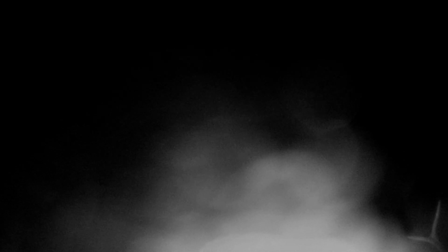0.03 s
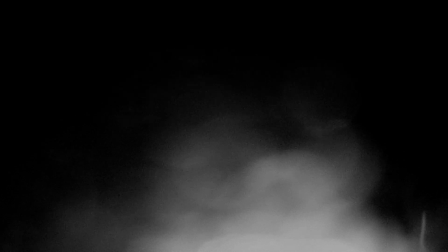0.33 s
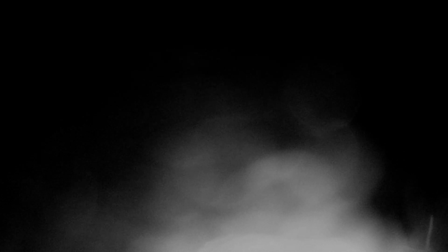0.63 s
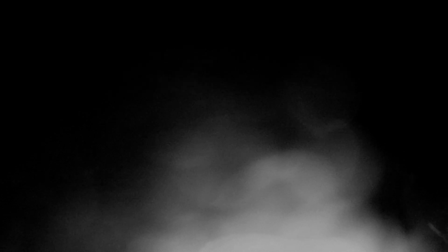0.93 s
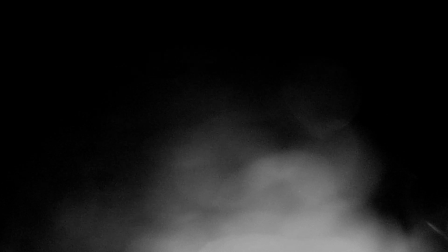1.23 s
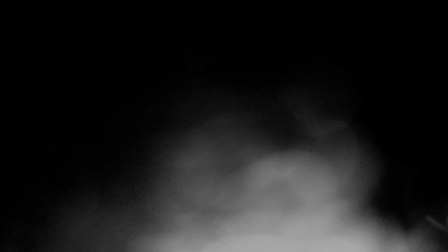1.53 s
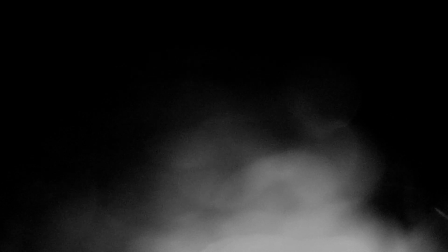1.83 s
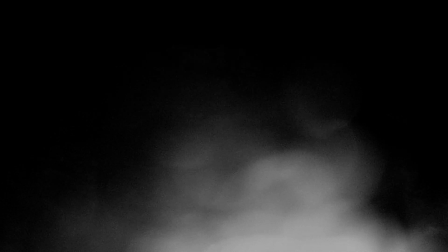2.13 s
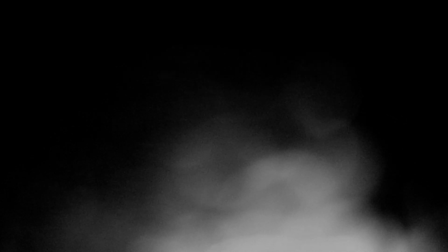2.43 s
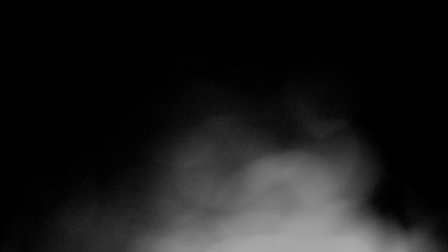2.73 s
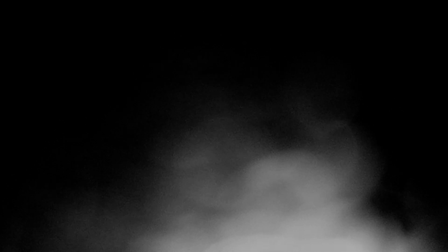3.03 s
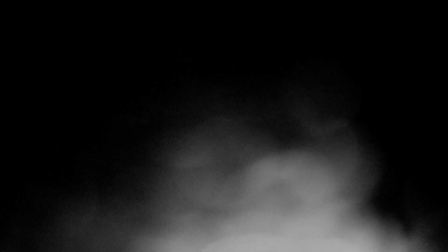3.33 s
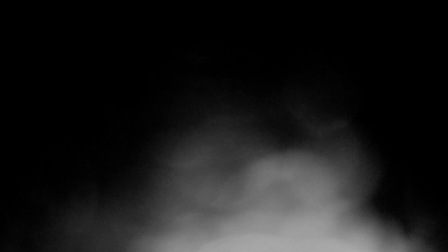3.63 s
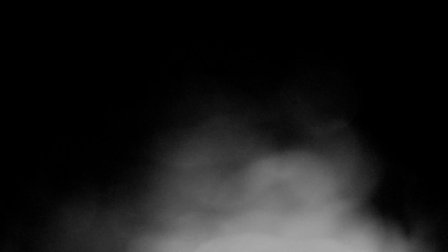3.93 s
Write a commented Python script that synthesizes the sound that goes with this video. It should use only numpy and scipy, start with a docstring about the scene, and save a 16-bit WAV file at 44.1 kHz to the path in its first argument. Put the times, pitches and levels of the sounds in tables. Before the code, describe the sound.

A dog whines close to the microphone in thin, falling squeals and huffs softly. It grumbles once and shifts, clattering against something hollow. Coyotes yip faintly far off in the night woods, then the dog whines again, hoarsely.

```python
"""In the woods at night. A dog close by whines in thin falling squeals, their upper harmonics shaped by
its muzzle; it huffs, grumbles once and shifts about, rustling and knocking on something hollow.
Far off, coyotes yip and howl in nearly pure glides that echo from the trunks.
A low machine throb and a faint hiss lie underneath."""
import sys
import numpy as np
from scipy import signal
from scipy.fft import rfft, irfft
from scipy.io import wavfile

SR = 44100
rng = np.random.default_rng(int(sys.argv[2]) if len(sys.argv) > 2 else 0)


def store_wav(level_fs):
    """Save 16-bit WAV to argv[1]."""
    pcm = np.round(np.clip(np.atleast_2d(level_fs), -1, 1) * 32767)
    wavfile.write(sys.argv[1], SR, pcm.T.astype(np.int16))


N = 176400
T = np.arange(N) / SR


def from_db(db):
    return 10 ** (np.asarray(db) / 20)


def unit_rms(x):
    return x / np.sqrt(np.mean(x ** 2) + 1e-20)


def curves(rows):
    """Each column after time, interpolated to every sample."""
    times_s, *columns = np.transpose(rows)
    return [np.interp(T, times_s, column) for column in columns]


def db_at(spectrum, hz):
    """Spectrum level, interpolated in log frequency."""
    points_hz, points_db = np.transpose(spectrum)
    return np.interp(np.log(hz + 1e-9), np.log(points_hz), points_db)


def drift(rate_hz):
    """Smooth random wander, rms 1."""
    hop, settle = 20, 2000
    pole = np.exp(-2 * np.pi * rate_hz * hop / SR)
    white = rng.standard_normal(N // hop + settle + 2)
    slow = signal.lfilter([1], [1, -2 * pole, pole * pole], white)[settle:]
    return np.interp(np.arange(N) / hop, np.arange(len(slow)), unit_rms(slow))


def shaped_noise(spectrum):
    gain = from_db(db_at(spectrum, np.fft.rfftfreq(N, 1 / SR)))
    return unit_rms(irfft(rfft(rng.standard_normal(N)) * gain, N))


def band_noise(low_hz, high_hz):
    bandpass = signal.butter(2, [low_hz, high_hz], "band", fs=SR, output="sos")
    return unit_rms(signal.sosfilt(bandpass, rng.standard_normal(N)))


def gate(start_s, end_s, fade_s):
    ramp = np.clip(np.minimum(T - start_s, end_s - T) / fade_s, 0, 1)
    return np.sin(np.pi / 2 * ramp) ** 2


def phase_of(hz):
    return 2 * np.pi * np.cumsum(hz) / SR


def ring(clicks, hz, t60_s):
    """One mode: a unit click starts a decaying unit sine."""
    radius = np.exp(-np.log(1000) / (t60_s * SR))
    angle = 2 * np.pi * hz / SR
    return signal.lfilter([0, np.sin(angle)], [1, -2 * radius * np.cos(angle), radius ** 2], clicks + 1e-18)


def glides(rows, fade_s, waver, second_db):
    """Wavering sine glides with a weak second harmonic."""
    out = np.zeros(N)
    wobble = 1 + waver * drift(28)
    for start_s, length_s, start_hz, end_hz, db in rows:
        end_s = start_s + length_s
        phase = phase_of(np.interp(T, [start_s, end_s], [start_hz, end_hz]) * wobble)
        tone = np.sin(phase) + from_db(second_db) * np.sin(2 * phase)
        out += from_db(db) * gate(start_s, end_s, fade_s) * tone
    return np.sqrt(2) * out


# Throb partials: (harmonic number, level [dB])
THROB_PARTIALS = [(1, -52), (2, -58), (3, -75), (4, -74), (5, -71.5), (7, -75), (8, -70)]


def machine_throb(pitch_hz=19.85):
    """Low machine harmonics, drifting slightly in pitch and level."""
    phase = phase_of(pitch_hz * (1 + 0.006 * drift(3)))
    out = np.zeros(N)
    for k, db in THROB_PARTIALS:
        out += from_db(db + 0.57 * drift(1.3)) * np.sin(k * phase + rng.uniform(0, 2 * np.pi))
    return np.sqrt(2) * out


# Noise floor: (frequency [Hz], gain [dB])
FLOOR_SPECTRUM = [(15, -24), (25, -6), (35, -7), (60, -19), (92, -13), (126, -27), (153, -17), (185, -23),
                  (300, -26), (411, -31.5), (770, -38.5), (934, -38.5), (1030, -37.5), (1160, -43.5),
                  (1310, -38.5), (1440, -42.5), (8000, -59), (10400, -93), (17600, -120)]


def faint_hiss(level_db=-62.5):
    """Steady noise, weighted to the bass."""
    return from_db(level_db) * shaped_noise(FLOOR_SPECTRUM)


def woods_echo(x, gain_db, t60_s=0.53):
    """Diffuse echo from the trunks."""
    tail = band_noise(324, 3780) * np.exp(-np.log(1000) * T / t60_s)
    tail /= np.sqrt(np.sum(tail ** 2))
    return from_db(gain_db) * signal.fftconvolve(x, tail)[:N]


# Calls: (time [s], length [s], start [Hz], end [Hz], level [dB])
COYOTE_CALLS = [(2.61, 0.072, 1310, 1240, -73.5), (2.63, 0.041, 850, 752, -71),
                (2.83, 0.045, 1120, 1059, -69.5), (2.85, 0.055, 760, 921, -62),
                (2.88, 0.066, 870, 986, -69.5), (2.97, 0.051, 730, 873, -64.5),
                (3.01, 0.077, 1000, 1005, -64), (3.1, 0.095, 950, 1141, -69.5),
                (3.22, 0.11, 980, 1127, -69), (3.29, 0.047, 1320, 1346, -73), (3.34, 0.097, 990, 1127, -71),
                (3.42, .06, 1360, 1340, -72), (3.47, 0.093, 1220, 1360, -70.5),
                (3.56, 0.095, 1330, 1294, -75), (3.63, 0.045, 1300, 1323, -67.5),
                (3.7, .08, 1330, 1060, -74.5), (3.76, 0.084, 1300, 1341, -71.5)]


def coyotes(direct_db=-6):
    """Far yips and howls, heard directly and off the trees."""
    calls = glides(COYOTE_CALLS, fade_s=0.008, waver=0.012, second_db=-28)
    return from_db(direct_db) * calls + woods_echo(calls, gain_db=-12.3)


# Brushes: (time [s], length [s], low band [dB], high band [dB])
BRUSHES = [(0.512, 0.11, -68, -81), (1.78, 0.0069, -101, -60), (2.13, 0.08, -56.5, -75.5),
           (2.243, 0.061, -72.5, -71.5), (2.324, 0.1, -74, -78.5), (2.918, 0.043, -77, -85.5),
           (3.06, 0.041, -77, -85.5)]


def rustles():
    """The dog shifts: brief grainy brushes, dull or bright."""
    low, high = band_noise(250, 1800), band_noise(3400, 7500)
    out = np.zeros(N)
    for start_s, length_s, low_db, high_db in BRUSHES:
        envelope = gate(start_s, start_s + length_s, fade_s=0.43 * length_s)
        out += envelope * (from_db(low_db) * low + from_db(high_db) * high)
    grain_db = 2.5 * drift(200)
    return out * from_db(grain_db)


# Impacts: (time [s], thud [dB], pock [dB], clack [dB], crack [dB])
IMPACTS = [(.486, -62, -59.5, -63, -91), (1.925, -58, -55, -57.5, -70), (1.992, -75, -53.5, -95, -55),
           (2.097, -51, -58, -58, -61.5), (2.1157, -39, -57, -36.5, -41), (2.133, -44.5, -48, -40, -72),
           (2.1375, -36, -47, -31, -56), (2.2299, -47, -43, -42, -51), (2.316, -62, -86, -68, -59.5),
           (2.3335, -38.5, -40.5, -56, -80), (2.352, -50, -65, -62, -65), (2.4166, -48, -48.5, -45.5, -75),
           (2.495, -47, -66, -78, -80), (2.916, -58, -56, -85, -87), (3.186, -59.5, -64, -97, -90),
           (3.704, -63, -82.5, -85, -92)]
# Modes of the hollow body and its hard edge: (frequency [Hz], gain [dB], t60 [s])
BODY_MODES = [(100.9, -5, 0.49), (159.4, -3, 0.11), (252, -5, .16), (311.5, -6, 0.083), (366, -3.5, 0.086),
              (424, 0, .08), (465.2, -2.5, 0.15), (612, -4.5, 0.087), (690, -5, .06), (791, -8, .05),
              (920, -7, .05), (1092, -12, .05), (1170, -30, 0.073)]
EDGE_MODES = [(1600, -42, 0.019), (1980, -10, 0.022), (2300, 2, .014), (2466, 0, 0.04), (2825, 4, 0.016),
              (3630, -9.5, 0.054), (4020, -4, 0.01)]


def knocks():
    """Each knock rings a hollow body and its edge, with contact noise and a short loose rattle."""
    times_s, thud_db, pock_db, clack_db, crack_db = np.transpose(IMPACTS)

    def strikes(db):
        clicks = np.zeros(N)
        clicks[(times_s * SR).astype(int)] = from_db(db)
        return clicks

    def decays(db, tau_s):
        return signal.lfilter([1], [1, -np.exp(-1 / (tau_s * SR))], strikes(db) + 1e-18)

    ringing = np.zeros(N)
    for modes, strike_db in ((BODY_MODES, thud_db - 6.5), (EDGE_MODES, clack_db - 6.5)):
        for k, (hz, mode_db, t60_s) in enumerate(modes):
            scatter_db = 2 * rng.standard_normal(len(times_s))
            ringing += (-1) ** k * ring(strikes(strike_db + mode_db + scatter_db), hz, t60_s)
    crack = decays(crack_db, tau_s=0.00074) * band_noise(4050, 6700)
    pock = decays(pock_db, tau_s=0.004) * band_noise(620, 1200)
    snap = decays(clack_db - 12.5, tau_s=0.0041) * band_noise(1554, 3820)
    rattle = decays(thud_db - 19, tau_s=0.035) * band_noise(234, 1200)
    return ringing + crack + pock + snap + rattle


# Airflow envelopes: (time [s], level [dB])
HUFF_ENVELOPE = [(0, -83), (.13, -74.5), (.3, -67.5), (.37, -66), (.5, -68.5), (.65, -80), (1.45, -76.5),
                 (1.63, -66), (1.74, -64), (1.88, -74.5), (2, -86.5), (3.85, -78), (3.91, -75.5), (4, -71)]
RASP_ENVELOPE = [(3.85, -95), (3.895, -73), (3.915, -63), (3.96, -62), (4, -65)]
# Airflow spectra: (frequency [Hz], gain [dB])
HUFF_SPECTRUM = [(250, 3), (450, 2), (800, 2.5), (1200, -7.5), (1700, -12.5), (2400, -4), (2900, -10),
                 (3300, -22.5), (3800, -12.5), (5000, -25.5), (6300, -21), (7100, -9), (8400, -20.5)]
RASP_SPECTRUM = [(1500, -25.5), (2200, 4), (2900, -2.5), (4000, -4), (4500, -17.5), (5300, -7),
                 (5900, -7.5), (6300, -18.5), (6900, -7.5), (8500, -25)]


def dog_breath():
    """Huffs after the whines; air rushes through the last as it breaks up."""
    huff = from_db(curves(HUFF_ENVELOPE)[0]) * shaped_noise(HUFF_SPECTRUM)
    rasp = from_db(curves(RASP_ENVELOPE)[0]) * shaped_noise(RASP_SPECTRUM)
    return huff + rasp


# Grumble contour: (time [s], pitch [Hz], level [dB])
GRUMBLE_CONTOUR = [(1.925, 254.6, -77), (1.95, 253.8, -57.5), (1.974, 227.3, -60), (1.997, 224, -59.5),
                   (2.02, 253.4, -60.5), (2.039, 280, -58.5), (2.062, 290, -77.5)]
# Grumble spectrum: (frequency [Hz], gain [dB])
GRUMBLE_SPECTRUM = [(230, 3.5), (500, 1.5), (1000, -0.5), (1300, -1), (1600, -21), (2500, -7.5),
                    (3500, -10), (4500, -24), (7000, -22.5), (8500, -28)]


def dog_grumble(jitter=0.0038, smear_rad=0.25):
    """Short buzzy groan; the pitch dips and rises."""
    hz, db = curves(GRUMBLE_CONTOUR)
    phase = phase_of(hz * (1 + jitter * drift(60)))
    buzz = np.zeros(N)
    for k in range(1, 36):
        offset_rad = rng.normal(0, 1) + smear_rad * drift(80)
        buzz += from_db(db_at(GRUMBLE_SPECTRUM, k * hz)) * np.cos(k * phase + offset_rad)
    envelope = from_db(db) * gate(GRUMBLE_CONTOUR[0][0], GRUMBLE_CONTOUR[-1][0], fade_s=0.0029)
    return unit_rms(buzz) * envelope


# Whimper notes: (time [s], length [s], start [Hz], end [Hz], level [dB])
SQUEAK_NOTES = [(1.075, 0.073, 1950, 2080, -76.5), (1.14, 0.073, 2140, 2380, -76),
                (1.21, 0.17, 2540, 2620, -82.5), (1.15, .16, 4390, 5250, -91.5),
                (2.04, 0.084, 2230, 2290, -73.5), (2.17, .065, 2360, 2310, -66)]
MOAN_NOTES = [(.145, .195, 139, 136.3, -52.5), (1.625, 0.081, 129.3, 138.3, -49)]
SHRIEK_NOTES = [(3.876, .028, 3850, 3250, -63.5), (3.897, .022, 3150, 2520, -57.5),
                (3.906, .024, 3450, 3300, -60.5), (3.978, .026, 2980, 2480, -57)]


def dog_whimpers():
    """Thin squeaks, throat hums as whines end, shrill sweeps as the last one cracks."""
    squeaks = glides(SQUEAK_NOTES, fade_s=0.011, waver=0.011, second_db=-25)
    moans = glides(MOAN_NOTES, fade_s=0.011, waver=0.0069, second_db=-22.5)
    shrieks = glides(SHRIEK_NOTES, fade_s=0.0088, waver=0.0073, second_db=-21)
    return squeaks + moans + shrieks


# Muzzle resonances: (frequency [Hz], gain [dB])
MUZZLE_RESPONSE = [(2000, -7.5), (2350, -2.5), (2620, 18.5), (2950, 12), (3200, 1.5), (3550, 6.5),
                   (4300, -10.5), (5100, -10), (5800, -11), (6300, -17), (7100, -2), (8500, -18)]


def whine(contour, upper_gain_db, tilt_db_per_oct, rasp, rasp_below_hz=950):
    """Squeal that roughens at low pitch; upper harmonics slide through the muzzle resonances."""
    hz, first_db, second_db, third_db, upper_db = curves(contour)
    roughness = rasp * np.clip(2 * (rasp_below_hz / hz - 1) + 0.5, 0, 1)
    jitter = 0.0027 * drift(60) + 0.014 * roughness * drift(360)
    phase = phase_of(hz * (1 + jitter))
    voice = sum(from_db(db) * np.sin(k * phase) for k, db in enumerate((first_db, second_db, third_db), 1))
    for k in range(4, 15):
        colour_db = db_at(MUZZLE_RESPONSE, k * hz) + tilt_db_per_oct * np.log2(k / 3)
        flicker_db = (4 - 0.5 * roughness) * drift(24)
        smear_rad = 0.35 * roughness * drift(112.5)
        gain = from_db(upper_db + upper_gain_db + colour_db + flicker_db) * (k * hz < SR / 4)
        voice += gain * np.sin(k * phase + smear_rad)
    shimmer_db = 0.65 * drift(71)
    return np.sqrt(2) * voice * from_db(shimmer_db) * gate(contour[0][0], contour[-1][0], fade_s=0.0029)


# Whines: (time [s], pitch [Hz], harmonic 1 [dB], harmonic 2 [dB], harmonic 3 [dB], upper harmonics [dB])
HIGH_CONTOUR = [(0.0, 1251, -56.5, -64.5, -73.5, -90), (0.098, 1293, -58.5, -57.5, -68.5, -82),
                (0.122, 1240, -57.5, -61, -65, -85), (0.138, 1201, -58.5, -57.5, -71, -67),
                (0.15, 1145, -60, -77, -84, -83), (0.164, 1073, -62, -75, -78, -77.5),
                (0.19, 1130, -89, -99, -81, -68)]
LOW_CONTOUR = [(0.0, 850, -88, -79, -60, -70), (0.012, 854, -71, -74, -75, -78),
               (0.038, 848.5, -69, -71, -67.5, -78), (0.192, 821, -64, -68.5, -62.5, -76.5),
               (0.24, 775, -65.5, -80.5, -63, -85), (0.28, 725, -96, -70.5, -65.5, -90),
               (0.328, 697.1, -66, -73, -72, -92), (0.342, 635.9, -88, -86, -102, -92),
               (0.36, 540, -82, -77, -86, -97)]
LONG_CONTOUR = [(1.29, 1644, -83, -102, -94, -96), (1.332, 1775, -61, -74, -86, -74),
                (1.37, 1728, -61.5, -74, -95.5, -76), (1.404, 1654, -46.5, -66.5, -78, -84),
                (1.416, 1610, -48, -94, -76, -73), (1.468, 1548, -53.5, -81, -85, -80),
                (1.498, 1525, -63, -84, -81, -71.5), (1.536, 1417, -53, -54, -64.5, -69.5),
                (1.596, 1247, -50, -75, -66, -68), (1.62, 1181, -47, -55, -76, -74.5),
                (1.634, 1101, -52.5, -66.5, -84, -76), (1.65, 828, -44.5, -73.5, -102, -78),
                (1.662, 749, -50.5, -83, -73.5, -78), (1.68, 830, -79, -90, -73, -83)]
LAST_CONTOUR = [(3.71, 1805, -106, -100, -107, -99), (3.75, 1791, -84, -59, -102, -86),
                (3.804, 1707, -73, -66, -91.5, -67.5), (3.824, 1606, -65.5, -71, -79, -78),
                (3.846, 1540, -71, -57, -107, -72), (3.87, 1370, -89, -58, -78, -61.5),
                (3.88, 1331, -66, -52.5, -84, -76), (3.89, 1198, -67, -71, -62, -60),
                (3.896, 1104, -67, -64, -71, -78), (3.914, 857, -68, -70, -56.5, -73),
                (3.926, 808, -63.5, -72, -78, -70), (3.938, 730, -72.5, -74, -68, -61),
                (4.0, 505, -65, -65, -70, -69)]


def dog_whines():
    """Four falling squeals: two at once, a long one, a hoarse last one."""
    return (whine(HIGH_CONTOUR, upper_gain_db=-4, tilt_db_per_oct=3.5, rasp=0.2)
            + whine(LOW_CONTOUR, upper_gain_db=1.5, tilt_db_per_oct=-2.5, rasp=0.2)
            + whine(LONG_CONTOUR, upper_gain_db=-2, tilt_db_per_oct=5, rasp=0.43)
            + whine(LAST_CONTOUR, upper_gain_db=1, tilt_db_per_oct=-8.5, rasp=0.95))


def scene():
    """Mono mix: dog close and nearly dry, coyotes far off, throb and hiss beneath."""
    dog = dog_whines() + dog_whimpers() + dog_grumble() + dog_breath() + knocks() + rustles()
    mix = dog + coyotes() + woods_echo(dog, gain_db=-31.8) + machine_throb() + faint_hiss()
    return mix[None]


def record(dry):
    """Two low-passes cut the top steeply."""
    rolloff_hz, cutoff_hz = 7900, 8500
    rolloff = signal.butter(8, rolloff_hz, fs=SR, output="sos")
    steep_cut = signal.ellip(10, 0.3, 70, cutoff_hz, fs=SR, output="sos")
    return signal.sosfilt(steep_cut, signal.sosfilt(rolloff, dry))


dry = scene()
out = record(dry)
store_wav(out)
```